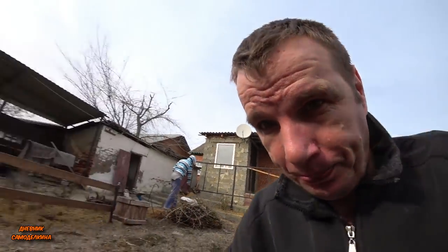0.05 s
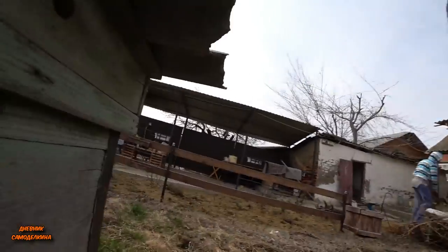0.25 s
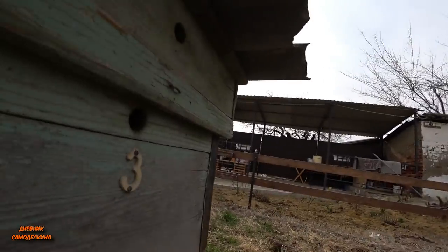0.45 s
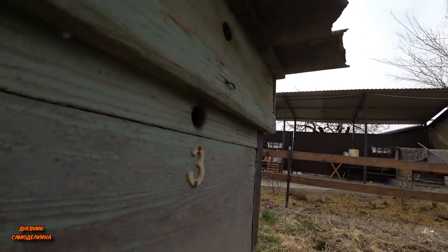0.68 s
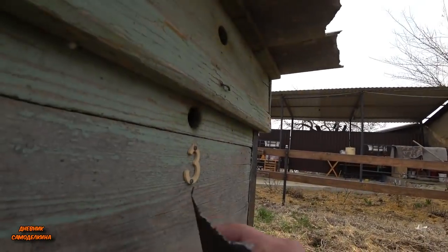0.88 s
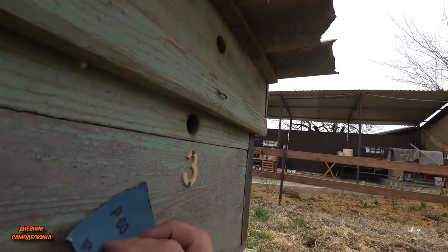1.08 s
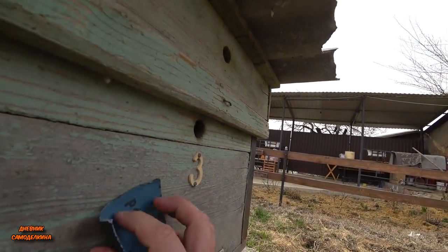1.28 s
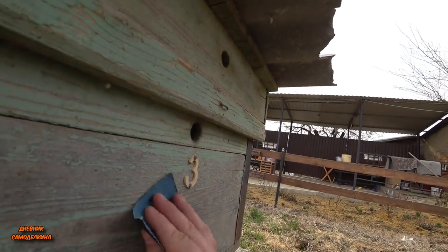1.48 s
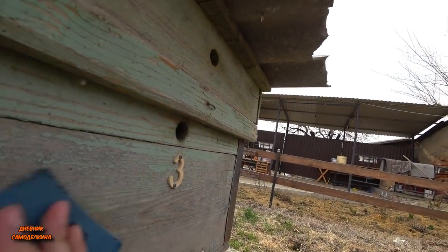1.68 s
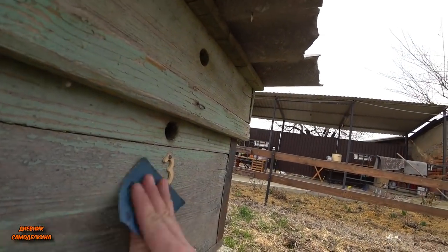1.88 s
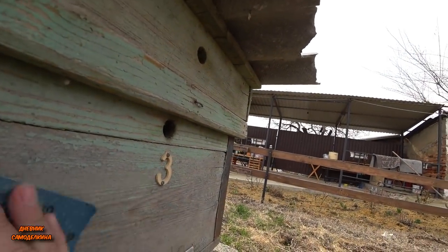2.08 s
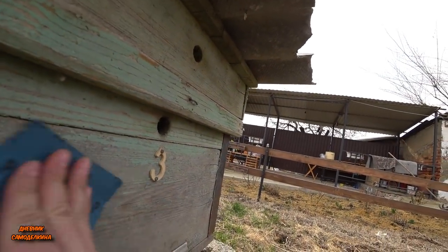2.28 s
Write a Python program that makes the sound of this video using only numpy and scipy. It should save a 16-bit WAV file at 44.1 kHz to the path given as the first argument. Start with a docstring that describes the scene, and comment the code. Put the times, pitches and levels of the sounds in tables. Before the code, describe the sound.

Hand sanding of weathered painted boards in a yard: a soft crackle of clothing and stiff paper first, then the sheet knocks down, slides and scuffs lightly, and finally scrubs in loud, quick, gritty strokes near the microphone.

```python
"""Cloth and paper rustle and snap, a sheet of sandpaper lands on a board with a knock, drags lightly,
then scrubs to and fro: a hand sands the painted boards of a wooden box in a yard, heard from close by.
Rustle, drag, scuffs and scrubbing are trains of tiny random clicks, coloured by a filter that changes
in time. Resonances make the board ring, snaps are single clicks, and knocks are fading sine waves."""
import sys
import numpy as np
from scipy import signal
from scipy.fft import rfft, irfft
from scipy.io import wavfile
from scipy.ndimage import uniform_filter1d

SR = 44100
rng = np.random.default_rng(int(sys.argv[2]) if len(sys.argv) > 2 else 0)


def linear_from_db(decibels):
    """Turn decibels (scalar or array-like) into linear amplitude factors; 0 gives 1."""
    return 10 ** (np.asarray(decibels, float) / 20)


def bounce(signal):
    """Save signal as a 16-bit WAV file at the path given by the first command-line argument."""
    frames = np.transpose(np.atleast_2d(signal))
    limited = np.clip(frames, -1, 1)
    pcm = np.round(limited * 32767).astype(np.int16)
    wavfile.write(sys.argv[1], SR, pcm)


N = 103590
T = np.arange(N) / SR
STOP_S = 0.011  # time in which a moving sheet brakes

# How alike left and right are: f/Hz, likeness (1 = the same)
LIKENESS = [(60, .97), (1000, .9), (4000, .94), (14000, .72)]
# Basic lean to the left, which each sound scales: f/Hz, left minus right/dB
LEAN_LEFT = [(150, -0.5), (700, 1.5), (3000, 2), (14000, 0)]


def evened(x):
    """Scales a sound to an average (rms) level of 1."""
    return x / np.sqrt(np.mean(x ** 2) + 1e-20)


def levelled(x):
    """Holds the slow level near 1, so that an envelope can set it."""
    power = (x ** 2).mean(0)
    return x / np.sqrt(uniform_filter1d(power, size=6000) + 1e-20)


def read(points, hz):
    """Reads a table of frequency and value, on a logarithmic frequency scale."""
    f, value = np.transpose(points)
    return np.interp(np.log(hz + 1), np.log(f + 1), value)


def curve(rows, t, order=1):
    """Reads one column of a table whose first column is time, with straight lines between rows."""
    rows = np.array(rows)
    return np.interp(t, rows[:, 0], rows[:, order])


def bump(middle, length, edge=2):
    """A smooth swell and fade around one moment; a higher edge makes the top flatter."""
    return np.exp(-abs(2 * (T - middle) / length) ** edge)


def resonate(x, hz, width):
    """A resonance of gain 1 on a fixed or moving frequency."""
    turn = np.exp(2j * np.pi * np.cumsum(hz * np.ones(x.shape[-1])) / SR)
    r = np.exp(-np.pi * width / SR)
    # shift the resonance down to 0 Hz, smooth there, and shift it back
    smooth = signal.lfilter([1 - r], [1, -r], x / turn)
    return 2 * (turn * smooth).real


def resonate_twice(x, hz, width):
    """Two equal resonances in a row, which cut more sharply than one."""
    return resonate(resonate(x, hz, width), hz, width)


def slow_chance():
    """Two unrelated random curves that wander over some hundredths of a second."""
    noise = rng.standard_normal((2, N))
    return evened(uniform_filter1d(uniform_filter1d(noise, size=900), size=900))


def grains(per_s, spread_db):
    """Two unrelated trains of tiny clicks at random moments; a few are large, up to a cap."""
    size = linear_from_db(spread_db * np.minimum(rng.exponential(1, (2, N)), 3))
    happens = rng.random((2, N)) < per_s / SR
    return evened(size * rng.standard_normal((2, N)) * happens)


def colour(x, tone_db, same, pan_db, patch_db, flicker_db):
    """Short-time filter: a spectrum by time, drifting patches, wide flicker and the stereo picture."""
    hz, t, (a, b) = signal.stft(x, SR, nperseg=512, noverlap=384)
    noise = rng.standard_normal((2, len(hz), len(t)))
    # patches are narrow and slow, flicker is wide and quick
    patch = evened(uniform_filter1d(uniform_filter1d(noise[0], size=7, axis=0), size=20, axis=1))
    flicker = evened(uniform_filter1d(uniform_filter1d(noise[1], size=90, axis=0), size=3, axis=1))
    # a shared part and an opposite part give left and right the wanted likeness
    likeness = np.clip(read(same, hz), 0, 1)[:, None]
    near = np.sqrt((1 + likeness) / 2) * a
    apart = np.sqrt((1 - likeness) / 2) * b
    half = pan_db(hz[:, None], t) / 2
    z = np.array([(near + apart) * linear_from_db(half), (near - apart) / linear_from_db(half)])
    z *= linear_from_db(tone_db(hz, t) + patch_db * patch + flicker_db * flicker)
    return signal.istft(z, SR, nperseg=512, noverlap=384)[1][:, :N]


def stroke_effort():
    """Each stroke rises, changes and brakes; under them the sheet still creeps at the turns."""
    # Scrubbing strokes: start/s, end/s, level before the resonances are added/dB, rise/s,
    # change over the stroke/dB
    strokes = [(1.394, 1.55, -21, 0.026, -1.5), (1.572, 1.788, -15.5, 0.042, -3.5),
               (1.783, 1.813, -21, 0.022, 2), (1.811, 1.934, -18, 0.014, -2.5),
               (1.941, 2.078, -19, 0.031, 0), (2.092, 2.231, -19, 0.03, 0.5),
               (2.236, 2.34, -16.5, 0.018, -3.5)]
    creep_db = -32.5
    fade_in = np.clip((T - strokes[0][0]) / STOP_S, 0, 1)
    fade_out = np.clip((T[-1] - T) / STOP_S, 0, 1)
    effort = linear_from_db(creep_db) * fade_in * fade_out
    for start, end, db, rise, change_db in strokes:
        shape = np.clip((T - start) / rise, 0, 1) ** 1.54 * np.clip((end - T) / STOP_S, 0, 1)
        progress = np.clip((T - start) / (end - start), 0, 1)
        effort = effort + shape * linear_from_db(db + change_db * progress)
    return effort


def sanding():
    """Grit tears paint loose in dense clicks that ring the board; colour and side follow the place."""
    # Where the sheet is: t/s, place (0 top right of the path, 1 bottom left),
    # resonance of the hollow under the hand before it wanders, f/Hz
    path = [(1.39, 0.57, 3760), (1.55, 0.032, 4360), (1.63, 0.53, 3060), (1.72, 1, 3600), (1.79, 1, 4340),
            (1.92, 0.057, 3100), (1.97, 0.51, 2400), (2.07, 1, 2680), (2.14, 0.73, 3500),
            (2.23, 0.39, 2860), (2.35, 1, 4340)]
    # Colour of the grit at the top: f/Hz, relative level per Hz/dB
    grit_top = [(40, -49), (200, -20.5), (1170, -2), (1660, -12), (2140, -7.5), (7400, -1), (10500, -1.5),
                (15500, -22)]
    # Colour of the grit low down: f/Hz, relative level per Hz/dB
    grit_low = [(40, -50), (500, -19.5), (1170, -6), (1350, -10), (1550, -2.5), (7230, -0.5), (11800, -11),
                (15500, -25)]
    # Board and hand resonances: f before it wanders/Hz, width of each of two passes/Hz,
    # level against the rub at the top/dB, the same low down/dB
    board = [(260, 80, -29.5, -40), (744, 160, -76, -18.5), (1163, 110, -54, -16.5),
             (2075, 160, -8.5, -24.5)]
    lean_top, lean_low = 0.54, 2.86  # factors on the basic lean to the left at either end
    drift_share, waver_db = 0.035, 2.5  # resonances wander and flare as the hand shifts

    def tone(hz, t):
        place = curve(path, t)
        return np.outer(read(grit_top, hz), 1 - place) + np.outer(read(grit_low, hz), place)

    def pan(hz, t):
        return read(LEAN_LEFT, hz) * (lean_top + (lean_low - lean_top) * curve(path, t))

    rub = levelled(colour(grains(25000, 2.36), tone, LIKENESS, pan, patch_db=2.5, flicker_db=0.77))
    place = curve(path, T)
    drive = grains(20000, 0.98)[0]
    hollow = (curve(path, T, order=2), 710, -12, -12)  # same columns as the board
    for hz, width, top_db, low_db in [*board, hollow]:
        side = linear_from_db(np.outer([0.5, -0.5], pan(hz, T)))
        drift, waver = slow_chance()
        ring = evened(resonate_twice(drive, hz * (1 + drift_share * drift), width))
        level = linear_from_db(top_db + (low_db - top_db) * place + waver_db * waver)
        rub = rub + side * level * ring
    return rub * stroke_effort()


def swells():
    """The board sings briefly where the grit catches: clicks pass through one resonance."""
    # Moments of ringing: middle/s, length/s, f/Hz, level before the stereo lean/dB
    catches = [(1.965, 0.032, 2270, -18.5), (.893, 0.029, 1800, -35.5)]
    drive = grains(6000, 1.0)[0]
    out = np.zeros(N)
    for s, length, hz, db in catches:
        out += linear_from_db(db) * bump(s, length) * evened(resonate(drive, hz, hz / 8))
    return out


def drag():
    """The sheet slides on the board with little weight, in a soft stream of clicks."""
    # Light drag: t/s, level/dB
    drag_level = [(.996, -26), (1.02, -35), (1.2, -36.5), (1.33, -37), (1.343, -45), (1.4, -37.5)]
    # Colour of the drag: f/Hz, relative level per Hz/dB
    drag_tone = [(60, -53), (260, -16), (500, -18), (1400, -6), (2000, -11.5), (4500, -12), (5700, -19.5),
                 (16000, -29)]
    x = colour(grains(15000, 0.68), lambda hz, t: read(drag_tone, hz)[:, None], LIKENESS,
               lambda hz, t: 0.78 * read(LEAN_LEFT, hz), patch_db=-1.0, flicker_db=1.95)
    fade_in = np.clip((T - drag_level[0][0]) / STOP_S, 0, 1)
    fade_out = np.clip((drag_level[-1][0] - T) / STOP_S, 0, 1)
    return levelled(x) * linear_from_db(curve(drag_level, T)) * fade_in * fade_out


def scuffs():
    """Short scuffs of the paper are bursts of coarse grains; each leans dull or bright."""
    # Scuffs: middle/s, length/s, level/dB, brightness (-3 or less all dull, 3 or more all bright)
    bursts = [(0.112, 0.0046, -36.5, 6), (.178, 0.0096, -38.5, 5), (0.211, 0.035, -38, -8),
              (0.338, 0.0045, -33.5, -5), (0.527, 0.012, -34.5, 1.5), (0.551, 0.021, -39, -1),
              (0.602, 0.011, -35, -2.5), (0.693, 0.02, -42, -0.7), (0.902, 0.066, -35.5, 0.5),
              (1.029, 0.0091, -29, -3), (1.098, 0.0089, -23, 1.7), (1.112, 0.017, -22.5, 3.1),
              (1.168, 0.017, -27, -3), (1.218, 0.018, -24.5, 2), (1.279, 0.037, -29.5, 3.2),
              (1.322, 0.031, -32.5, 1.5), (1.364, 0.012, -32, -1.5), (1.392, 0.0037, -26.5, -1),
              (1.576, 0.012, -21.5, -7.5)]
    # Colour of the scuffs before the tilt: f/Hz, relative level per Hz/dB
    scuff_tone = [(150, -44), (1400, -8.5), (5840, -2.5), (7500, -1.5), (11500, -12), (15500, -32)]

    def tilted(tilt):
        """Coarse grains tilted by about this many dB per octave around 5000 Hz."""
        def tone(hz, t):
            return (read(scuff_tone, hz) + tilt * np.log2(hz / 5000 + 0.06))[:, None]
        return levelled(colour(grains(12000, 5.4), tone, LIKENESS,
                               lambda hz, t: 0.3 * read(LEAN_LEFT, hz), patch_db=2.6, flicker_db=1.8))

    dull, bright = tilted(-3), tilted(3)
    out = np.zeros((2, N))
    for s, length, db, brightness in bursts:
        share = np.clip(0.5 + brightness / 6, 0, 1)
        mix = np.sqrt(1 - share) * dull + np.sqrt(share) * bright
        out += linear_from_db(db) * bump(s, length, edge=1.25) * mix
    return out


def without_bass(x):
    """A filter thins the sound below 190 Hz."""
    return signal.lfilter(*signal.butter(2, 190, "high", fs=SR), x)


def snaps():
    """The stiff paper snaps: one click and its quickly fading crumbs, through two wide resonances."""
    # Snaps: t/s, peak before bass filter and stereo lean/dB, upper resonance (the other is at half)/Hz
    paper_snaps = [(.352, -13.5, 5000), (.647, -15.5, 6500), (1.3355, -5.5, 7000), (1.367, -19, 8000),
                   (1.9466, -12, 8500)]
    width_hz, crumble_s = 4500, 0.0013
    out, t = np.zeros(N + SR), np.arange(SR // 5) / SR
    for s, db, hz in paper_snaps:
        crumbs = 0.32 * rng.standard_normal(len(t)) * np.exp(-t / crumble_s)
        click = crumbs + (t == 0)
        snap = resonate(resonate(click, hz, width_hz), hz / 2, width_hz)
        snap = np.diff(snap, prepend=0)  # brightens
        out[round(s * SR):][:len(t)] += linear_from_db(db) * snap / abs(snap).max()
    return without_bass(out[:N])


def knocks():
    """Knocks ring the modes of the board as fading sine waves; soft ones ring mostly the low modes."""
    # Knocks: t/s, peak before bass filter and stereo lean/dB, hardness (higher modes ring weakly)/Hz
    board_knocks = [(.9948, -17, 2200), (.9978, -19, 2200), (.9996, -15.5, 2200), (1.96, -27, 300),
                    (.208, -38, 600), (.648, -38, 650), (.768, -42, 1200)]
    # Modes of the board: f/Hz, relative level before the hardness/dB, time to fade by 60 dB/s
    modes = [(281, -0.5, 0.024), (399, -9, 0.047), (646, 1, 0.027), (927, 9, 0.03), (1180, 3.5, 0.052),
             (1310, 13, 0.03), (1397, 0.5, 0.033)]
    out, t = np.zeros(N + SR), np.arange(SR // 5) / SR
    for s, db, hard_hz in board_knocks:
        ring = np.zeros(len(t))
        for hz, mode_db, t60 in modes:
            level = linear_from_db(mode_db - 60 * t / t60) / (1 + (hz / hard_hz) ** 4)
            ring += level * np.sin(-2 * np.pi * hz * t)
        ring = ring * np.minimum(t * hard_hz / 2, 1)  # a softer knock starts more slowly
        out[round(s * SR):][:len(t)] += linear_from_db(db) * ring / abs(ring).max()
    return without_bass(out[:N])


def chirp():
    """A faint, fuzzy whistle that rises and falls: noise through a narrow moving resonance."""
    middle_s, length_s, top_hz, arch_hz, level_db = 0.759, 0.042, 4650, 350, -49  # level before the lean
    hz = top_hz - arch_hz * np.clip(2 * (T - middle_s) / length_s, -1, 1) ** 2
    whistle = evened(resonate(rng.standard_normal(N), hz, 60))
    return linear_from_db(level_db) * bump(middle_s, length_s, edge=4.4) * whistle


def rustle():
    """Soft crackle of cloth and dry grass in dense clicks; a duller band under it dies away early."""
    # Crackle: t/s, level/dB
    rustle_level = [(0, -45), (.25, -42.5), (.49, -46.5), (.66, -46), (.72, -52), (.82, -45.5),
                    (.93, -45.5), (.975, -51.5)]
    # Colour of the crackle: f/Hz, relative level per Hz/dB
    rustle_tone = [(60, -24), (400, -10.5), (1700, -3), (4530, 0), (10500, -9.5), (15500, -15.5)]
    # How alike left and right are: f/Hz, likeness (1 = the same)
    rustle_likeness = [(100, 0.7), (2000, 0.39), (15000, 0.56)]
    high = colour(grains(20000, 1.5), lambda hz, t: read(rustle_tone, hz)[:, None], rustle_likeness,
                  lambda hz, t: 0 * hz, patch_db=3.0, flicker_db=2.0)
    low_hz, low_width_hz, low_db, low_end_s = 1030, 690, -47.5, 0.26
    low = resonate_twice(grains(20000, 0.85), low_hz, low_width_hz)
    low = evened(low + 0.94 * low[::-1])  # blends each side into the other
    low = low * linear_from_db(low_db) * bump(0, 2 * low_end_s)
    return levelled(high) * linear_from_db(curve(rustle_level, T)) + low


def scene():
    """Adds up all layers; the one-channel sounds lean slightly to the left."""
    wide = sanding() + drag() + scuffs() + rustle()
    single = swells() + snaps() + knocks() + chirp()
    return wide + single * linear_from_db(np.array([[0.6], [-0.6]]))


def roll_off(x):
    """The treble ends steeply here."""
    return signal.sosfilt(signal.butter(12, 16680, fs=SR, output="sos"), x)


def record(dry):
    """Two microphone ports hear with a phase offset; tall peaks are rounded off and the top is cut."""
    # Phase by which the left port leads: f/Hz, lead/radians
    port_lead = [(150, -0.053), (1200, 0.96), (1750, 0.43), (8000, -0.71), (13000, 0.77)]
    edge_hz = 15900
    hz = np.fft.rfftfreq(N, 1 / SR)
    half = np.exp(0.5j * read(port_lead, hz))
    rounded = np.tanh(dry)
    mix = irfft(rfft(rounded) * np.array([half, 1 / half]) * (hz < edge_hz), N)
    return roll_off(mix)


dry = scene()
out = record(dry)
bounce(out)
```